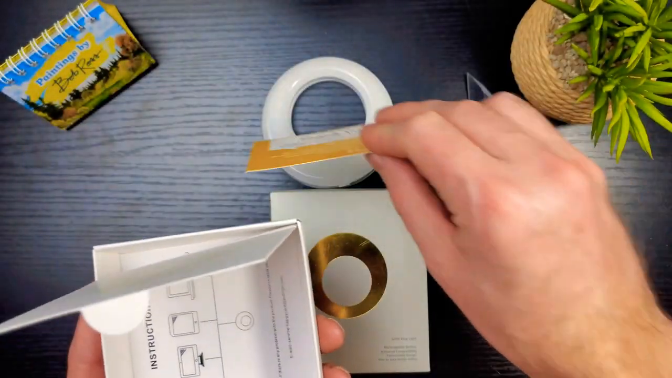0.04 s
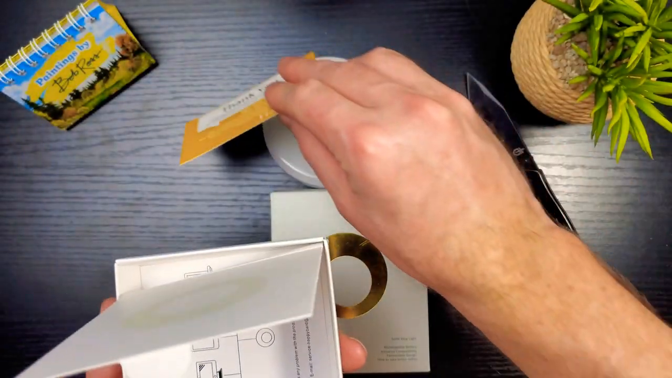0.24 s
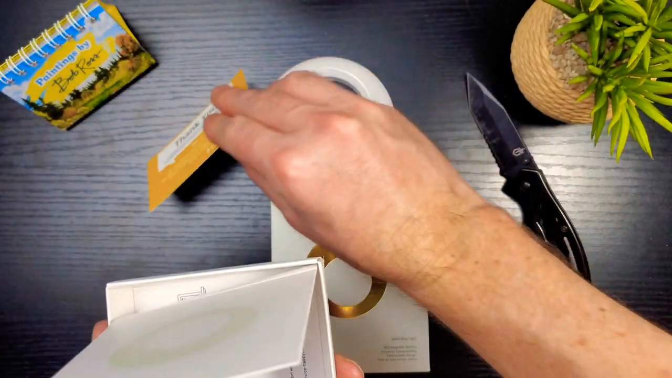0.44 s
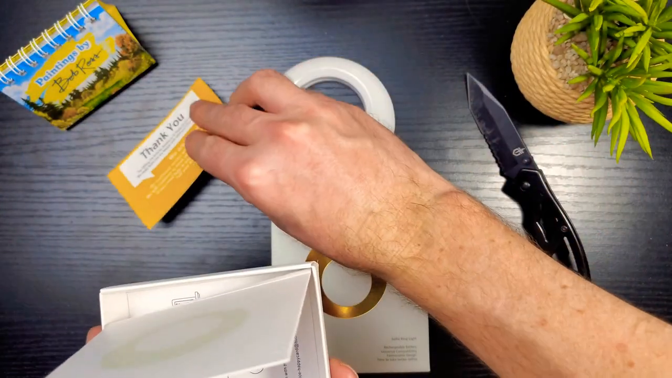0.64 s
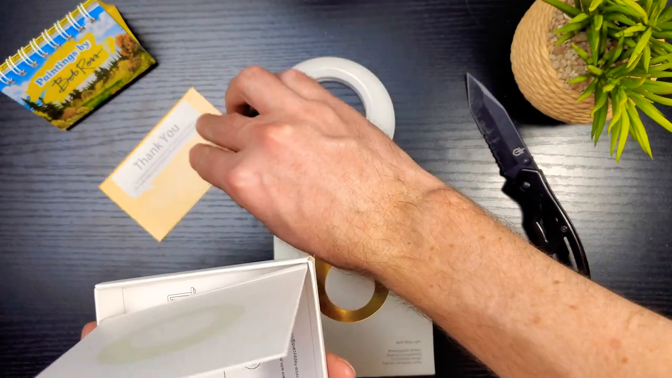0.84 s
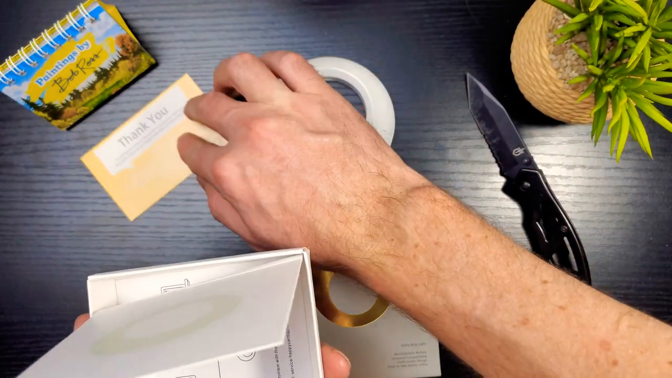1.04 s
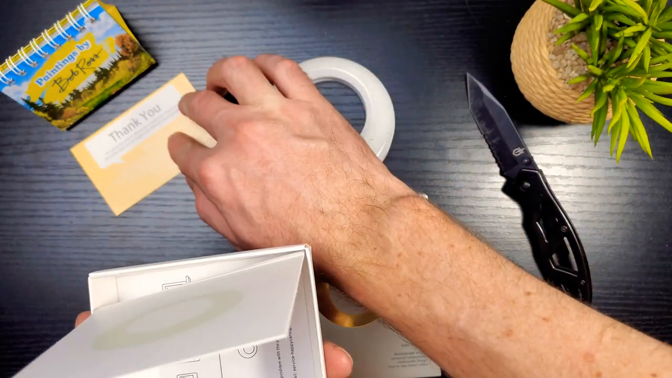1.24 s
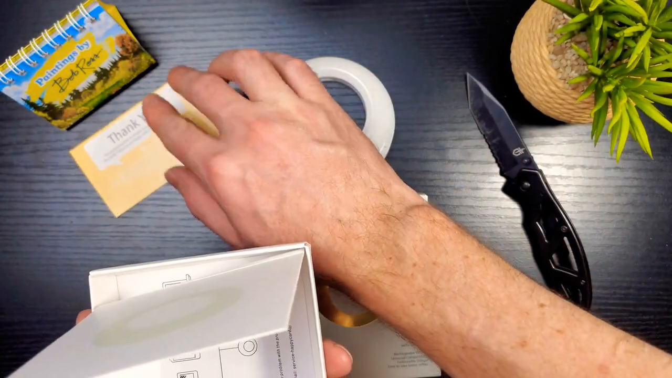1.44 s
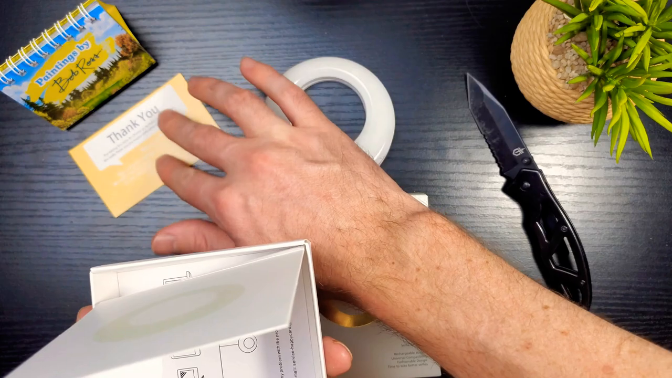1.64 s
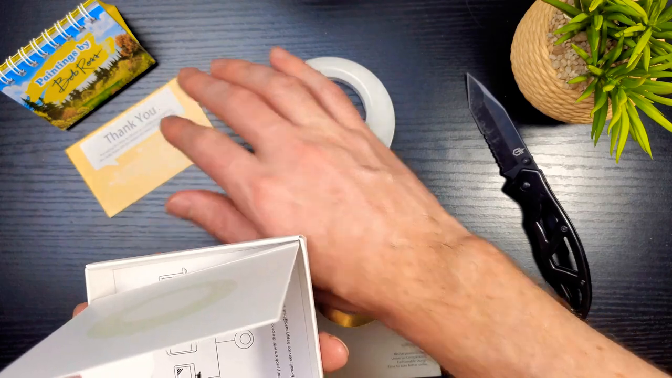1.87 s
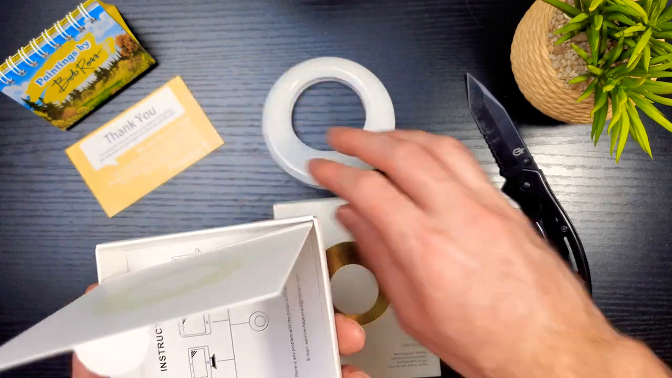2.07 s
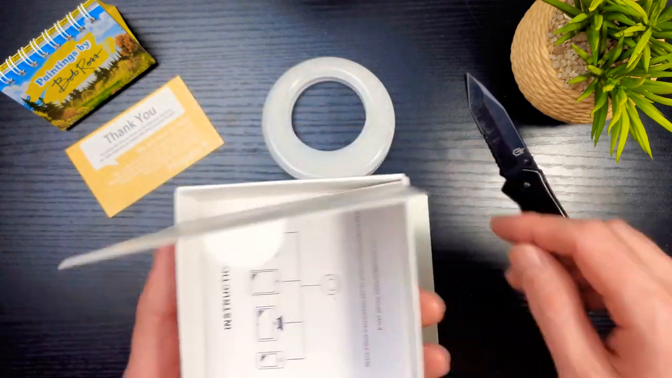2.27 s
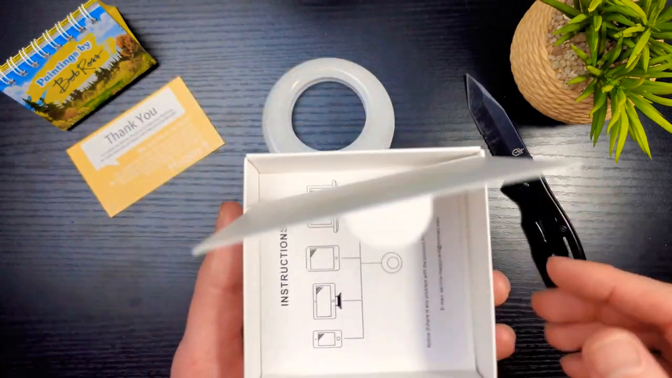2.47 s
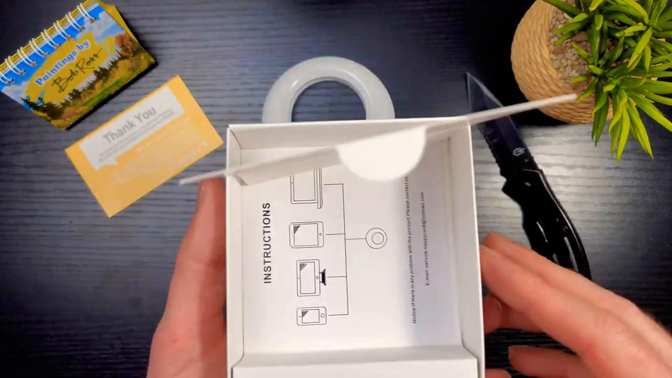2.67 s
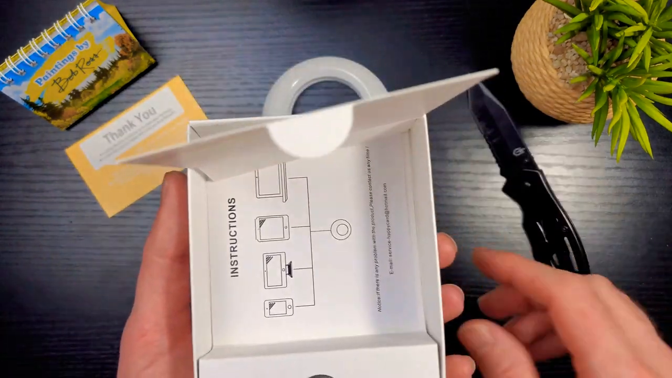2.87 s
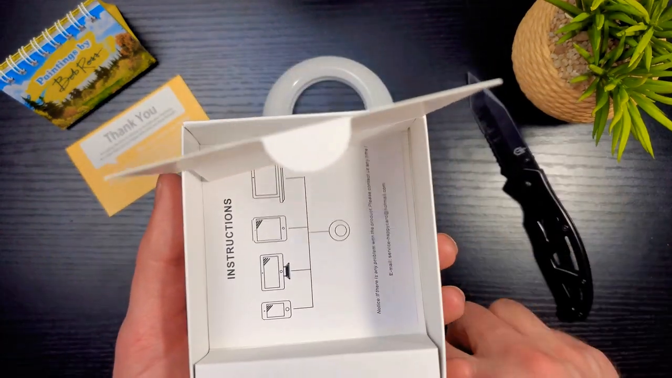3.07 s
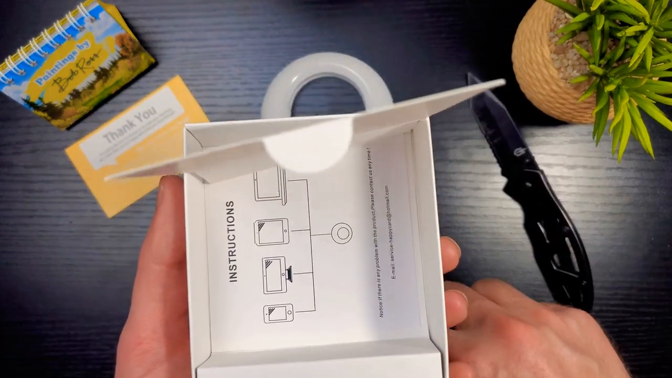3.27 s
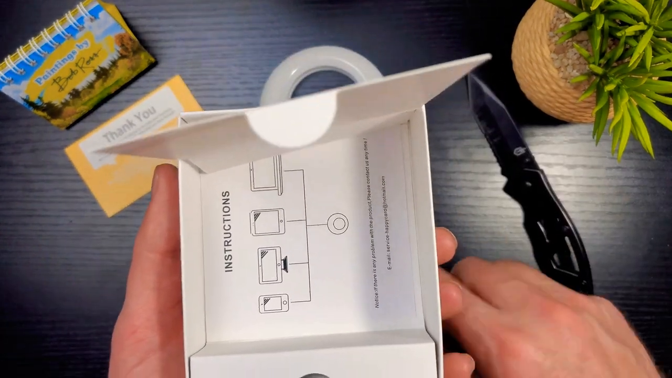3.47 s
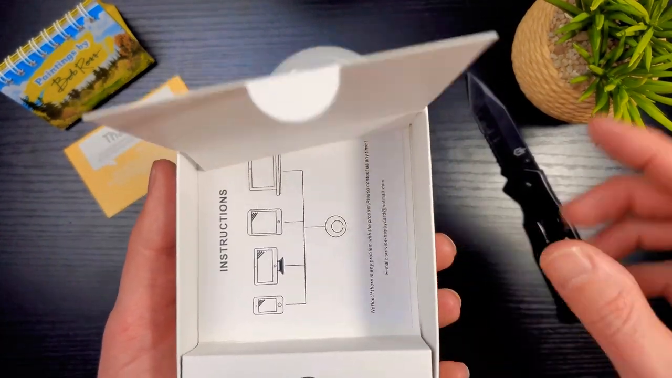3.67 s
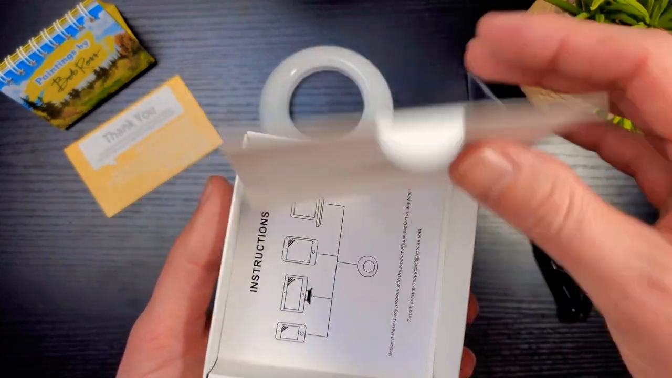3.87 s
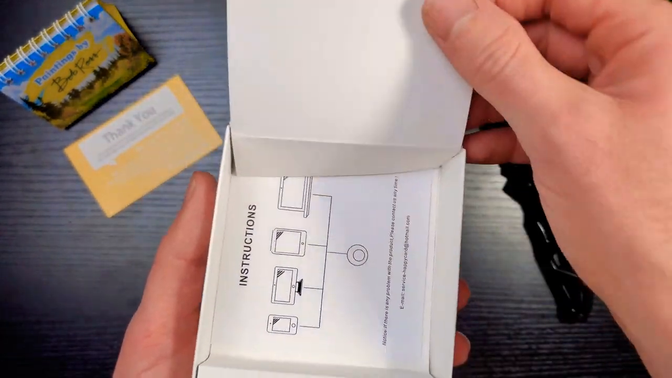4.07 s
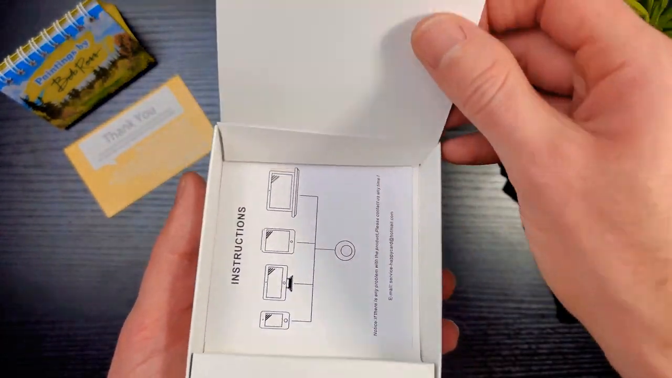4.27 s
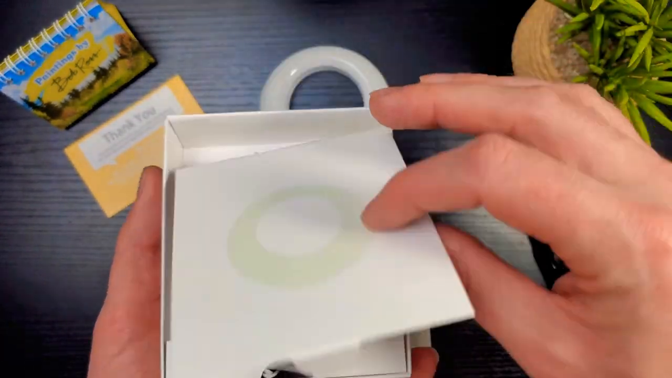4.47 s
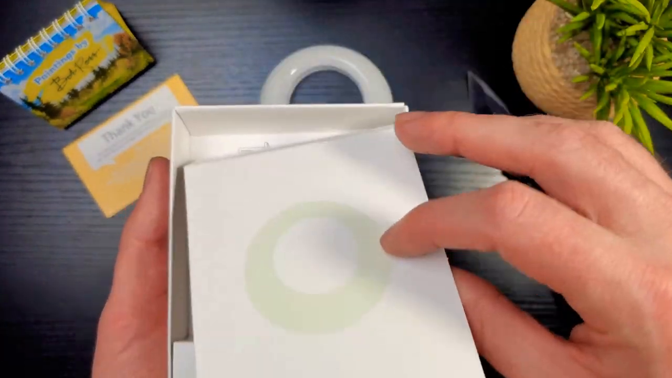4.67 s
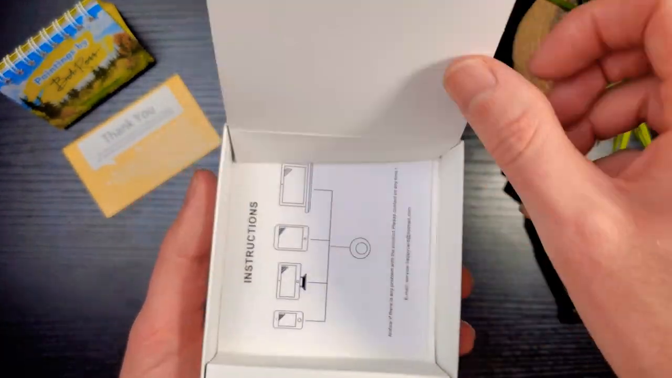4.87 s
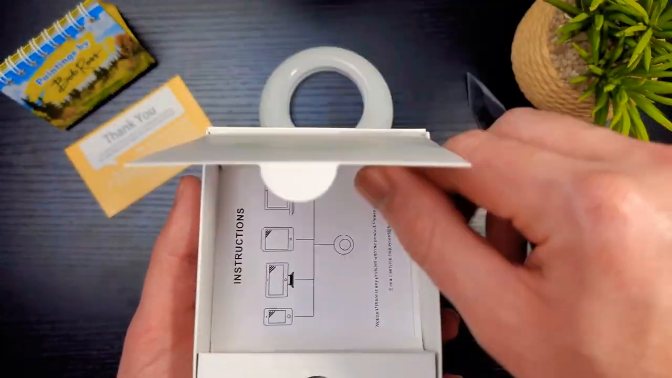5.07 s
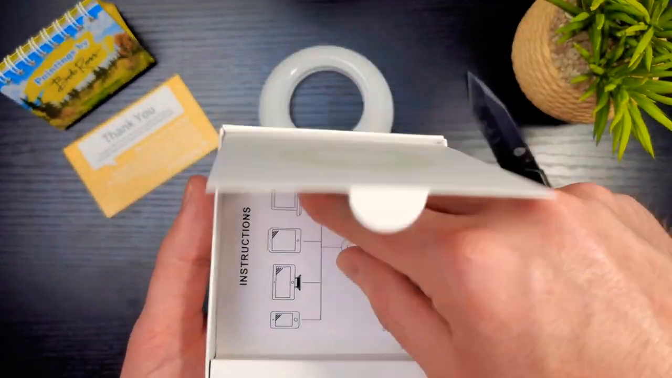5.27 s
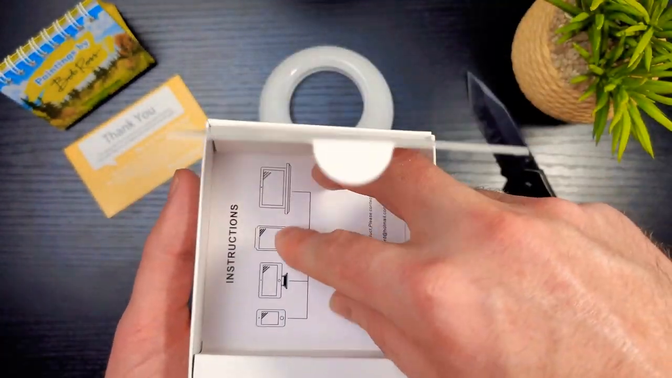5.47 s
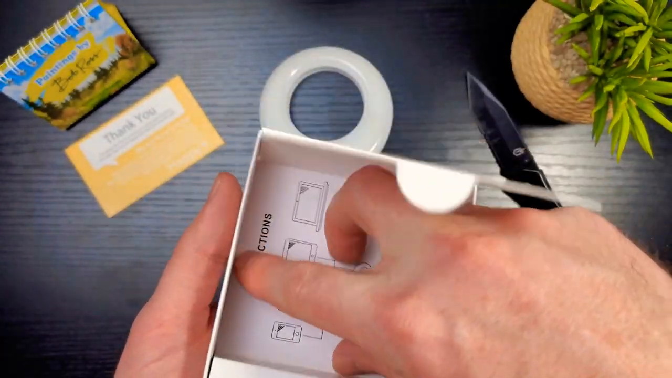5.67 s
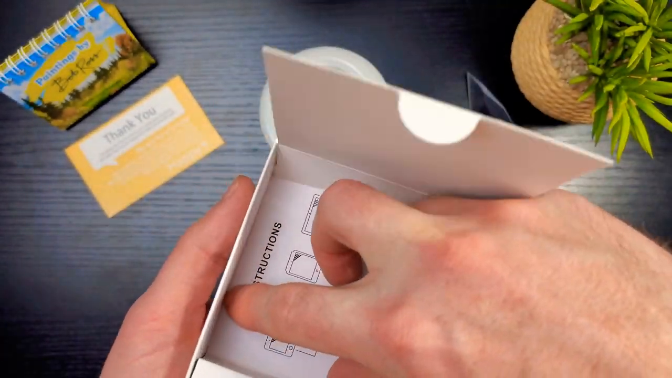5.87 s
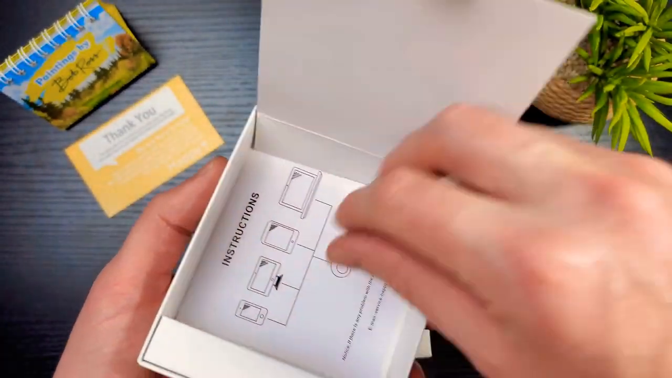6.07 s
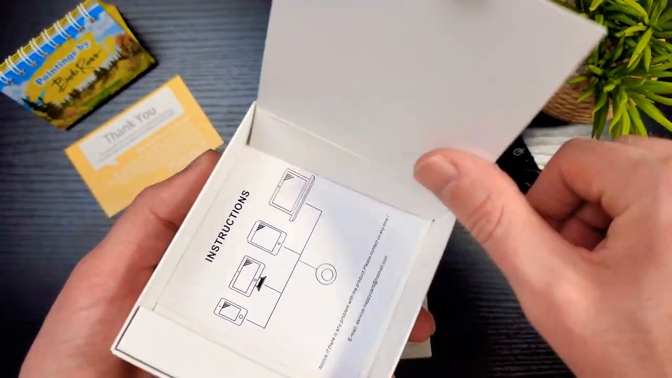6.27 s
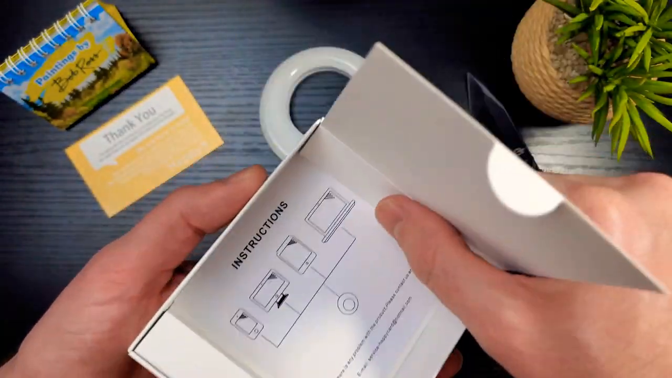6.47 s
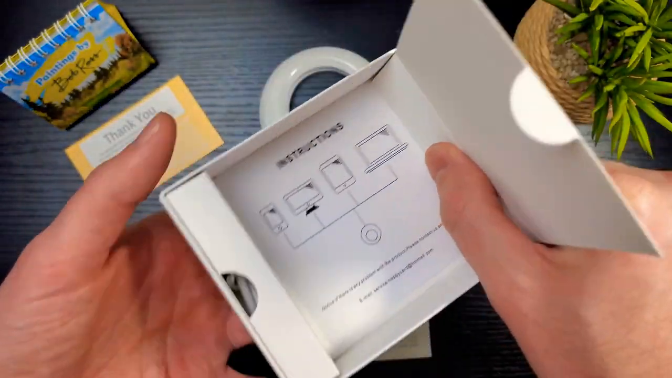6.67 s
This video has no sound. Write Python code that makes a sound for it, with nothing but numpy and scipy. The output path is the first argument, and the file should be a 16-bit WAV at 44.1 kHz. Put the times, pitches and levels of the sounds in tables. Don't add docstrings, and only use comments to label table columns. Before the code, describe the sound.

Close, dry handling of a small cardboard box: faint card rubs, two hollow lid scrapes on a desk, then busy snaps, slaps and low thumps.

```python
import sys
import numpy as np
from scipy import signal
from scipy.fft import rfft, irfft, next_fast_len
from scipy.io import wavfile
from scipy.ndimage import uniform_filter1d

SR = 44100
rng = np.random.default_rng(int(sys.argv[2]) if len(sys.argv) > 2 else 0)


def nominal_scale(level):
    x = np.asarray(level, float) / 20
    return 10 ** x


def bounce(signal):
    frames = np.transpose(np.atleast_2d(signal))
    limited = np.clip(frames, -1, 1)
    pcm = np.round(limited * 32767).astype(np.int16)
    wavfile.write(sys.argv[1], SR, pcm)


N = 296790

# pitch in Hz, width in Hz, level in dB.
CAVITY = [(1170, 170, 2), (1390, 187, 5), (1533, 350, 1.5), (2040, 190, 0.5), (2340, 700, -8.5)]


def evened(x):
    return x / np.sqrt(np.mean(x ** 2) + 1e-20)


def add(mix, s, sound):
    part = mix[round(s * SR):][:len(sound)]
    part += sound[:len(part)]


def coloured(x, points):
    hz, db = np.transpose(points)
    size = next_fast_len(len(x))
    f = np.fft.rfftfreq(size, 1 / SR)
    gain = nominal_scale(np.interp(np.log(f + 1), np.log(hz + 1), db))
    return evened(irfft(rfft(x, size) * gain, size)[:len(x)])


def ring(x, modes):
    out = np.zeros(len(x))
    for k, (hz, width, db) in enumerate(modes):
        sign = (-1) ** k
        out += sign * nominal_scale(db) * signal.lfilter(*signal.iirpeak(hz, hz / width, SR), x)
    return out


def resonate(x, hz, width):
    turn = np.exp(2j * np.pi * np.cumsum(hz) / SR)
    r = np.exp(-np.pi * width / SR)
    return 2 * (turn * signal.lfilter([1 - r], [1, -r], x / turn)).real


def track(tables, column):
    rows = np.concatenate(tables)
    return np.interp(np.arange(N) / SR, rows[:, 0], rows[:, column])


def level(tables, column):
    t = np.arange(N) / SR
    touching = sum((t >= rows[0][0]) & (t < rows[-1][0]) for rows in tables) > 0
    return uniform_filter1d(touching * nominal_scale(track(tables, column)), size=150)


def slips(per_s, spread_db, smooth, lump_db, lump_s):
    size = nominal_scale(spread_db * np.minimum(rng.exponential(1, N), 4)) * (rng.random(N) < per_s / SR)
    drive = evened(size * rng.standard_normal(N)) + smooth * rng.standard_normal(N)
    span = max(int(lump_s * SR), 2)
    lumps = evened(uniform_filter1d(uniform_filter1d(rng.standard_normal(N), span), span))
    return evened(drive * nominal_scale(lump_db * lumps))


def banded(x, dice, depth_db, width):
    bands = evened(uniform_filter1d(uniform_filter1d(dice, width), width))
    size = next_fast_len(len(x) // 2) * 2
    place = np.linspace(0, len(dice) - 1, size // 2 + 1)
    gain = nominal_scale(depth_db * np.interp(place, np.arange(len(dice)), bands))
    return evened(irfft(rfft(x, size) * gain, size)[:len(x)])


def patchy(x, depth_db, dice):
    z = signal.stft(x, nperseg=256)[2]
    across_hz = uniform_filter1d(dice[:z.shape[1]].T, size=4, axis=0)
    patches = evened(uniform_filter1d(across_hz, size=7, axis=1))
    return signal.istft(z * nominal_scale(depth_db * patches), nperseg=256)[1][:N]


def rubbing():
    # frequency in Hz, level in dB per Hz.
    fizz_colour = [(900, -21), (2000, -6.5), (2800, -6.5), (5000, -5), (6500, -12), (9000, -23),
                   (16000, -35.5)]
    hiss_colour = [(4000, -18), (6300, -8), (7600, -2), (8400, 1), (9500, -4.5), (11000, -9.5),
                   (13500, -5.5), (16000, -13.5)]
    # start in seconds, length in seconds, pressure in dB, ring of the box in dB.
    strokes = [(0.1, .043, -64, -61.5), (1.065, 0.035, -55, -55), (1.112, 0.084, -65, -56.5),
               (1.243, 0.047, -63.5, -56), (1.733, 0.043, -60.5, -60.5), (2.185, 0.05, -70, -75.5),
               (2.507, 0.059, -51, -41), (4.052, 0.017, -41.5, -30.5), (4.399, 0.042, -41, -49),
               (4.449, .045, -52, -34), (4.742, 0.055, -54, -40.5), (4.791, 0.038, -51, -54),
               (4.836, 0.07, -45.5, -41), (4.878, 0.055, -49.5, -53), (6.269, 0.0076, -44, -48),
               (6.313, 0.099, -46.5, -58), (6.629, 0.06, -46.5, -47.5)]
    slides = [(0.0, 0.021, -54.5, -73), (0.234, .11, -70, -64), (0.716, 0.041, -39, -37),
              (0.769, 0.056, -46.5, -46), (0.867, 0.055, -35, -37.5), (0.918, 0.07, -46, -31),
              (2.022, 0.053, -56.5, -54.5), (3.657, .31, -85.5, -62.5), (3.977, 0.025, -53, -38),
              (4.175, .023, -46.5, -47), (4.345, 0.06, -49, -39.5), (4.974, 0.028, -48.5, -42),
              (5.04, 0.074, -39.5, -38), (5.108, .11, -47.5, -34.5), (5.265, 0.08, -44, -59),
              (5.342, 0.042, -59, -39), (5.485, 0.042, -50, -44), (5.686, 0.049, -46, -38),
              (5.997, 0.11, -48, -40.5), (6.106, 0.077, -41, -49), (6.198, 0.04, -45, -39),
              (6.405, 0.14, -42, -45.5), (6.563, 0.056, -41, -43.5)]
    scrapes = [(0.15, 0.038, -58, -58, 3430), (0.554, 0.088, -45.5, -44, 4450),
               (0.645, 0.061, -53, -49.5, 3100), (0.838, 0.066, -34.5, -42, 4540),
               (2.656, 0.065, -61.5, -60, 4800), (2.742, 0.032, -62.5, -52.5, 2710),
               (3.149, 0.064, -55, -61.5, 5340), (3.211, .098, -45.5, -27, 2756),
               (3.28, 0.14, -42, -50, 5570), (4.086, 0.04, -29.5, -27.5, 3320),
               (4.226, 0.031, -34.5, -28, 3370), (4.281, .03, -30, -30, 3470),
               (4.639, 0.057, -60, -36.5, 2780), (5.411, 0.054, -59, -57, 3300),
               (5.533, 0.058, -52.5, -46.5, 3400), (5.603, 0.075, -45.5, -38, 3300),
               (5.759, 0.033, -49.5, -39, 3962), (5.799, .047, -42.5, -40.5, 4940),
               (5.862, .11, -51.5, -43.5, 2280), (5.158, 0.0087, -30.5, -38, 4730),
               (5.204, .006, -26.5, -36, 3400), (6.199, 0.0099, -38.5, -34, 4800),
               (4.118, 0.022, -34.5, -39, 4130), (1.181, .025, -62.5, -61, 3480),
               (0.995, 0.043, -54.5, -55, 3400)]
    # resonance of the card in Hz, hiss over fizz in dB
    rubs = [(*row, 4430, 6.5) for row in strokes]
    rubs += [(*row, 4920, 1.5) for row in slides]
    rubs += [(*row, -8) for row in scrapes]

    card, fibres, air = (slips(2500, 2.6, 1.3, 1.6, .008) for _ in range(3))
    fizz = coloured(card, fizz_colour)
    hiss = coloured(0.32 * card + fibres, hiss_colour)
    cavity = ring(ring(.5 * card + air, CAVITY), [(1330, 520, 0.002)])
    cavity += nominal_scale(-20) * ring(air, [(626.0, 120, 0.0035)])

    out = np.zeros(N)
    dice = rng.standard_normal((len(rubs), 3, 440))
    for (s, length, fizz_db, cavity_db, hz, over_db), (a, b, c) in zip(rubs, dice):
        start = max(s - .008, 0)
        hiss_db = fizz_db + over_db
        first = round(start * SR)
        part = slice(first, first + 2 * round((length + 0.055) * SR / 2))
        n = len(out[part]) // 2 * 2
        t = np.arange(n) / SR
        swell = np.sin(np.pi / 2 * np.clip(t / (0.012 + 0.4 * length), 0, 1))
        fade = nominal_scale(-60 * np.maximum(t - length - .006, 0) / min(.06, 0.024 + length))
        edge = ring(card[part][:n], [(hz, 550, 0)])
        bright = fizz[part][:n] + nominal_scale(9.8 - 0.5 * max(over_db, 0)) * edge
        sound = nominal_scale(fizz_db - 0.5) * banded(bright, a, 2.0, width=6)
        sound += nominal_scale(hiss_db - 1.5) * banded(hiss[part][:n], b, 2.0, width=7)
        sound += nominal_scale(cavity_db - 4.0) * banded(cavity[part][:n], c, 3.5, width=2)
        add(out, start, swell * fade * sound)
    return patchy(out, 2.2, rng.standard_normal((N // 128 + 4, 129)))


def dragging():
    # time in seconds, drag in dB, pitch factor of the hollow.
    drags = [
        [(.845, -44.5, .9), (.93, -26.5, 1.08), (.95, -18, 0.85), (.995, -22, .97), (1.03, -41, .82),
         (1.075, -43, .72), (1.24, -56, .58), (1.4, -55, .56), (1.46, -71, .56)],
        [(3.216, -22.5, 1.01), (3.26, -23.5, .98), (3.34, -22.5, 1.01), (3.39, -21.5, .96), (3.43, -23.5, .95),
         (3.437, -32, .9), (3.465, -37.5, 0.81), (3.51, -53.5, .85), (3.62, -82.5, .8)],
    ]
    # pitch in Hz, width in Hz, level in dB.
    lid = [(288.4, 93, -4.5), (440, 360, -5.5), (539.5, 110, -0.5), (650, 80, -2.5), (723, 74, 7),
           (755, 71, 5.5), (1087, 200, -5), (1160, 120, -3.5), (1410, 180, -14), (1920, 32, -22.5)]
    # start in seconds, peak in dB, pitch in Hz.
    jolts = [(0.852, -18, 676), (0.892, -19, 740), (0.944, -2.5, 727), (0.97, -2, 640), (0.981, -9, 703),
             (0.934, -12, 900), (0.957, -16, 700), (0.988, -8, 650), (0.996, -14, 640), (1.008, -16, 600),
             (3.239, -10, 716), (3.266, -11, 665), (3.286, -5.5, 770), (3.297, -10, 705), (3.308, -10, 715),
             (3.402, -10, 708), (3.414, -11.5, 687), (3.424, -12, 696), (3.216, -8, 622), (3.224, 3, 691),
             (3.248, -10.5, 686), (3.319, 5.5, 704), (3.3405, 2, 690), (3.357, 0, 660), (3.373, -6, 695)]

    drive = slips(800, 1.8, .9, .9, .005)
    factor = np.clip(track(drags, column=2), .5, 1.5)
    hollow = np.zeros(N)
    for k, (hz, width, db) in enumerate(lid):
        hollow += (-1) ** k * nominal_scale(db) * resonate(drive, hz * factor, width)
    out = evened(hollow) * level(drags, column=1) * nominal_scale(-2.5)

    t = np.arange(1200) / SR
    for s, db, hz in jolts:
        tones = np.sin(2 * np.pi * hz * t) + 0.4 * np.sin(2 * np.pi * 1.65 * hz * t)
        add(out, s, nominal_scale(db + 1.0 - 60 * t / 0.021) * (1 - np.exp(-t / 0.0024)) * tones)
    return out


def snaps():
    # pitch in Hz, width in Hz, level in dB.
    crack_modes = [(3173, 220, 5), (4262, 1400, 4.5), (4900, 700, 9), (7974, 990, -2), (12700, 3700, -17)]
    # start in seconds, crack in dB, knock in dB, knock pitch in Hz.
    ticks = [(2.045, -44.5, -39, 1880), (2.3655, -57, -53.5, 1410), (2.6332, -50.5, -44.5, 1550),
             (3.3188, -14, -21, 1120), (4.584, -45, -40.5, 1530), (4.6818, -59, -32.5, 1160),
             (4.763, -34, -37, 2120), (4.8014, -42, -24, 1170), (5.1545, -18, -27, 1120),
             (5.178, -13.5, -18, 1410), (5.2933, -19, -17, 1200), (5.4708, -29, -35, 1480),
             (5.4861, -23.5, -27.5, 1470), (5.765, -32, -33, 1940), (6.122, -37, -33.5, 1310)]
    knocks = [(0.2527, -42.5, -54.5, 1900), (0.671, -46, -45, 1200), (2.533, -28.5, -35.5, 1630),
              (2.7437, -50, -46.5, 1480), (3.1925, -20, -46, 1990), (3.2251, -35, -16.5, 1170),
              (3.3407, -18.5, -30, 1050), (3.6648, -54, -49, 1430), (3.8739, -62, -57, 1390),
              (4.0082, -20.5, -30.5, 1430), (4.0471, -31, -25.5, 1090), (4.1402, -15.5, -18.5, 1550),
              (4.306, -16, -23.5, 1390), (4.4706, -16.5, -18.5, 1023), (4.669, -53, -34.5, 1170),
              (4.8566, -33, -28, 1170), (4.8906, -5.5, -13.5, 1127), (4.9803, -24.5, -27, 1344),
              (5.134, -22, -17, 1350), (5.198, -18, -21, 1150), (5.26, -20, -22, 880),
              (5.2698, -19, -20, 1070), (5.3524, -24, -22, 1390), (5.4973, -26.5, -34, 1380),
              (5.8284, -26, -31.5, 1580), (6.0677, -30, -27, 1307), (6.2067, -23, -26, 1210),
              (6.3637, -37, -29.5, 1330), (6.6989, -20.5, -30.5, 2080)]
    # start in seconds, crack in dB, knock in dB, body in dB.
    blows = [(0.0985, -45, -69, -46.5), (0.5491, -31, -30.5, -43.5), (0.8814, -9, -46, -47),
             (0.8841, -5, -30, -27.5), (0.8922, -2, -26, -24.5), (1.059, -40, -60, -39),
             (1.7321, -39.5, -64, -46.5), (3.2164, -23, -30, -28), (3.977, -15.5, -21.5, -22.5),
             (4.035, -22, -24.5, -22.5), (5.2526, -14, -19.5, -13), (5.3009, -12.5, -20.5, -22),
             (5.69, -43, -37.5, -36), (5.776, -31, -32, -35.5), (6.2178, -27, -31, -39),
             (6.259, -17, -24, -18.5), (6.304, -13, -19.5, -22.5), (6.5196, -46, -32.5, -37),
             (6.562, -29, -40, -42.5)]
    wall_modes = [(216.0, 70, -0.7), (329.6, 65, 0.94), (425, 70, -0.88)]  # Hz, width Hz, dB
    blow_hz = 1380
    hits = [(*row, row[2] - 19.5) for row in ticks]
    hits += [(*row, row[2] - 8) for row in knocks]
    hits += [(*row[:3], blow_hz, row[3]) for row in blows]

    out = np.zeros(N)
    t = np.arange(2600) / SR
    noise = rng.standard_normal((len(hits), 3, len(t)))
    for (s, crack_db, knock_db, hz, body_db), (a, b, c) in zip(hits, noise):
        crack_fade = 0.97 * nominal_scale(-60 * t / 0.0014) + 0.86 * nominal_scale(-60 * t / 0.0099) + nominal_scale(-18.5 - 60 * t / 0.042)
        crack = evened(ring(a, crack_modes)) * crack_fade
        crack += nominal_scale(7.5) * (t == 0)
        rattle = 0.86 * evened(ring(b, CAVITY)) * nominal_scale(-60 * t / 0.028)
        knock = np.sin(2 * np.pi * hz * t) * nominal_scale(-60 * t / 0.024) + rattle
        knock *= 1 - np.exp(-t / 0.00047)
        wall = evened(ring(ring(c, wall_modes), [(317, 2000, 0)]))
        body = np.sin(2 * np.pi * 300 * t) * nominal_scale(-60 * t / 0.016) + 0.67 * wall * nominal_scale(-60 * t / 0.068)
        body *= 1 - np.exp(-t / 0.001)
        add(out, s, nominal_scale(crack_db - 4.0) * crack + nominal_scale(knock_db + 5) * knock + nominal_scale(body_db + 7.0) * body)
    return out


def slaps():
    # start in seconds, peak in dB, direction of the push (plus or minus, about 1).
    slap_rows = [(0.8921, -2, 0.78), (3.9782, -11, 0.97), (4.035, -15, -0.89), (4.0495, -14, 1),
                 (4.1405, -12.5, -0.68), (4.8912, -3, 0.97), (5.1342, -14.5, -0.89), (5.178, -12, -1),
                 (5.2527, 0, 1), (5.26, -7, 1), (5.2696, -6, 1), (5.2938, -5.5, -0.97), (5.301, -7, 1),
                 (5.4705, -30, 0.78), (5.4863, -26, 0.83), (5.6905, -20.5, -1.05), (5.777, -20, -1.1),
                 (5.831, -25, -0.83), (6.2066, -17, -0.91), (6.304, -5, 0.77)]
    rise_s = .00012
    out = np.zeros(N)
    u = np.arange(200) / SR / rise_s
    for s, db, direction in slap_rows:
        add(out, s, direction * nominal_scale(db) * u * (np.exp(1 - u) - 0.24 * np.exp(-u / 3)))
    return out


def squeaks():
    # start in seconds, length in seconds, peak in dB, pitch in Hz.
    squeak_rows = [(0.852, .01, -27, 4690), (0.867, 0.01, -24, 4480), (0.879, .008, -10, 4760),
                   (0.881, .009, -23, 3490), (0.87, .018, -28, 1380), (1.016, 0.057, -32, 569.4),
                   (3.242, 0.011, -17, 1153), (3.272, 0.02, -20, 332), (3.317, 0.013, -21, 1840),
                   (3.299, 0.013, -33, 3500), (3.372, 0.013, -17.5, 1169), (3.415, .025, -24, 431),
                   (3.439, 0.029, -31.5, 699), (4.096, .012, -24.5, 2600), (4.222, 0.052, -25, 1330),
                   (4.278, 0.048, -25.5, 1317), (4.645, 0.057, -38, 1200), (0.715, .045, -36, 1498),
                   (5.153, .012, -16, 1100), (5.197, 0.016, -15, 1152), (5.2, 0.009, -25, 1990),
                   (5.354, 0.0068, -25.5, 2000), (5.339, 0.029, -29, 1200), (5.487, 0.01, -28.5, 1465),
                   (5.548, .018, -43, 2160), (5.626, 0.01, -29.5, 1790), (5.763, 0.0084, -34, 1980),
                   (5.805, 0.013, -40, 5020), (6.2, 0.011, -32, 4900), (6.559, .02, -35.5, 1423),
                   (6.6, 0.016, -34.5, 4970)]
    wobble, flutter_db = .1, 4
    out = np.zeros(N)
    dice = rng.standard_normal((len(squeak_rows), 2, 4000))
    for (s, length, db, hz), (a, b) in zip(squeak_rows, dice):
        u = np.arange(0, 1, 1 / (length * SR))
        drift, flutter = (evened(uniform_filter1d(v, size=40))[:len(u)] for v in (a, b))
        tone = np.sin(2 * np.pi * hz * np.cumsum(1 + wobble * drift) / SR)
        add(out, s, nominal_scale(db + flutter_db * flutter) * np.sin(np.pi * u ** .9) * tone)
    return out


def thumps():
    # start in seconds, peak in dB, pitch in Hz.
    caught = [(3.328, -26, 49.2), (3.978, -3, 105), (4.007, -4.5, 86.5), (4.047, -9.5, 45.5),
              (4.14, -9.5, 135), (4.472, -8.5, 122), (4.893, -8, 94), (5.113, -6, 105.5), (5.162, -18, 72),
              (5.179, -11, 96.9), (5.348, -9, 71), (5.811, -17.5, 92), (5.83, -26, 60), (6.218, -5, 114),
              (5.224, -15.5, 70), (5.305, -13, 70), (5.326, -13.5, 80), (6.265, -4.5, 62), (6.282, -10, 55),
              (6.303, -2, 93), (5.26, -9.5, 131), (5.715, -24, 75), (5.95, -30.5, 80), (5.841, -17, 57.7)]
    free = [(.099, -40, 161), (0.55, -43, 66), (1.735, -30, 64), (3.229, -27, 107), (4.981, -18, 94),
            (5.134, -13.5, 88), (5.197, -10.5, 109), (5.255, -19, 105.6), (5.296, -13, 75.5),
            (5.493, -31, 92), (5.613, -26, 80.5), (5.69, -25, 82), (6.07, -27, 111.5), (6.203, -19, 116),
            (6.257, -2, 80), (6.365, -23, 80)]
    rows = [(*row, 0.072) for row in caught]
    rows += [(*row, 0.13 - 0.03 * row[1]) for row in free]
    out = np.zeros(N)
    t = np.arange(SR // 3) / SR
    for s, db, hz, t60 in rows:
        turns = hz * (0.797 * t + 0.0057 * (1 - np.exp(-t / 0.0089)))
        swing = np.sin(2 * np.pi * turns) + 0.45 * np.sin(1.1 * np.pi * turns)
        add(out, s, nominal_scale(db - 60 * t / t60) * (1 - np.exp(-t / 0.0019)) * swing)
    return out


def shaking():
    # pitch in Hz, width in Hz, level in dB.
    panels = [(42.4, 9.9, -2), (60, 38.1, -1), (95.5, 55.6, 0), (134, 69.7, -6), (230.6, 93, -17.5),
              (347, 120, -21)]
    # time in seconds, level in dB.
    shakes = [
        [(0.0, -56), (1.05, -43), (1.68, -63.5), (1.72, -49.5), (3.17, -54), (3.968, -55), (3.98, -27),
         (4.19, -33.5), (4.65, -44), (5.1, -38), (5.115, -27.5), (5.36, -27), (5.4, -43.5), (6.19, -40.5),
         (6.22, -25), (6.33, -26), (6.44, -44), (6.73, -49)],
    ]
    drive = slips(49, 2.6, 0.95, 1.5, 0.026)
    return evened(ring(drive, panels)) * level(shakes, column=1) * nominal_scale(-3)


def room(x):
    t = np.arange(SR // 3) / SR
    dull = signal.lfilter([1], [1, -.6], rng.standard_normal(len(t)))
    tail = dull * nominal_scale(-60 * t / 0.18) * (t > .004)
    return signal.oaconvolve(x, tail / np.linalg.norm(tail))[:N]


def room_hum():
    # frequency in Hz, level in dB per Hz.
    hum_colour = [(12, -71), (43, -7), (65, -6.5), (154, -21.5), (270, -26), (400, -41), (900, -39),
                  (16000, -47.5)]
    return nominal_scale(-54) * coloured(rng.standard_normal(N), hum_colour)


def amplifier_noise():
    # frequency in Hz, level in dB per Hz.
    noise_colour = [(18, -38), (30, -6.5), (500, -4), (5170, -23.5), (16000, -16.5)]
    return nominal_scale(-74.5) * coloured(rng.standard_normal(N), noise_colour)


def scene():
    near = rubbing() + dragging() + snaps() + slaps() + squeaks()
    hum = room_hum()
    mono = near + nominal_scale(-18.0) * room(near) + thumps() + shaking() + hum
    trace = amplifier_noise()
    return np.array([mono + trace, mono - trace])


def top_cut(x):
    return signal.sosfilt(signal.butter(12, 16800, fs=SR, output="sos"), x)


def record(dry):
    treble_cut = signal.firwin(255, 15900, fs=SR)
    x = signal.oaconvolve(np.clip(dry, -1, 1), treble_cut[None], "same")
    x = signal.lfilter(*signal.butter(2, 32, "high", fs=SR), x)
    return top_cut(x)


dry = scene()
out = record(dry)
bounce(out)
```